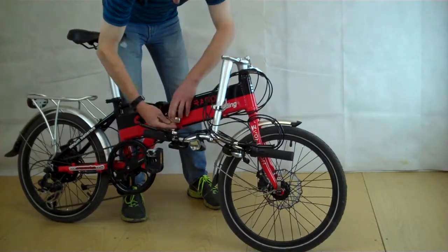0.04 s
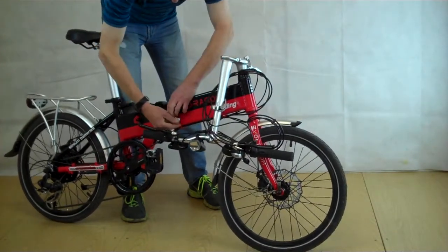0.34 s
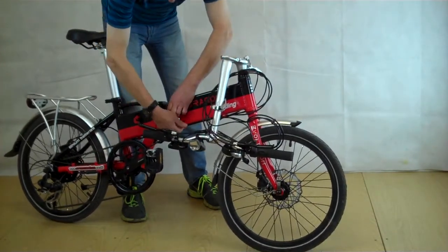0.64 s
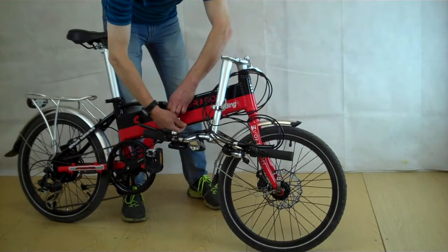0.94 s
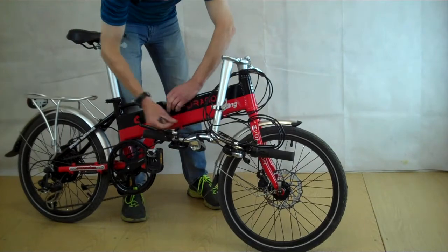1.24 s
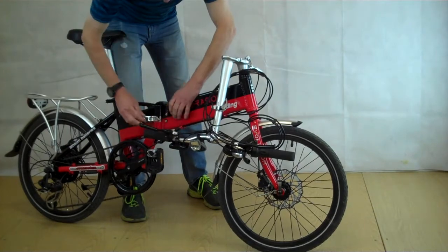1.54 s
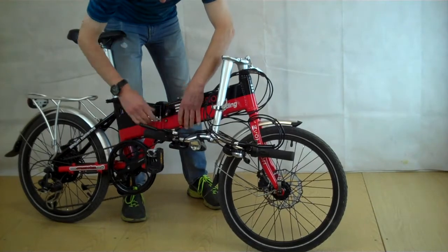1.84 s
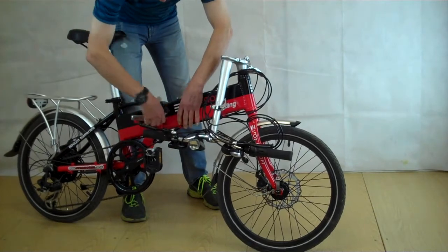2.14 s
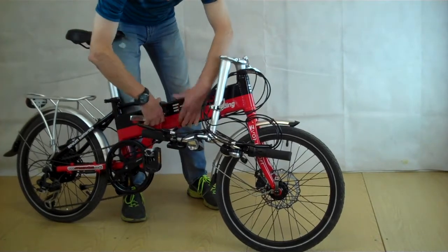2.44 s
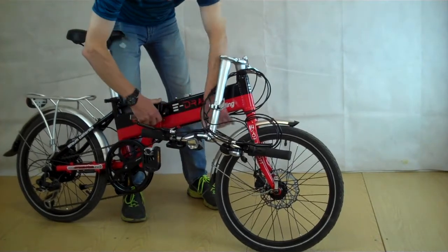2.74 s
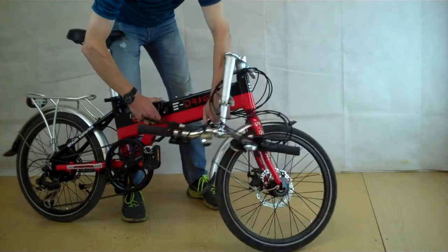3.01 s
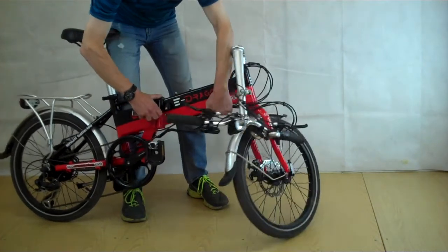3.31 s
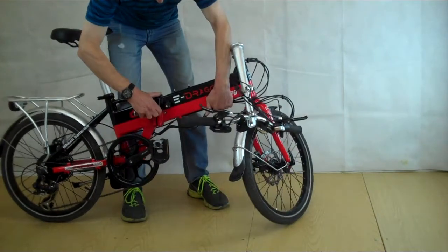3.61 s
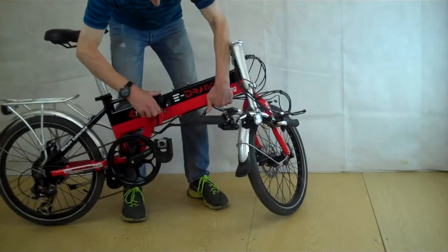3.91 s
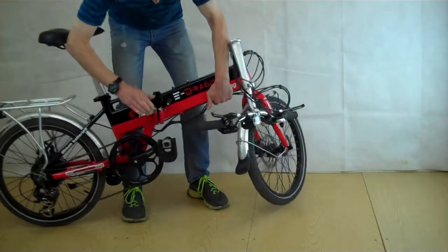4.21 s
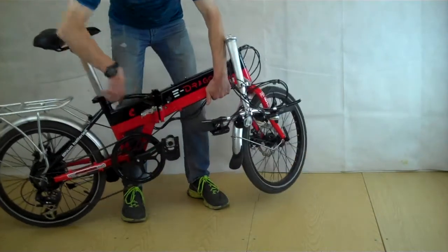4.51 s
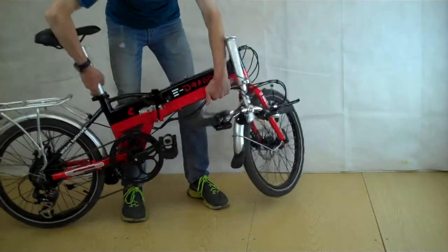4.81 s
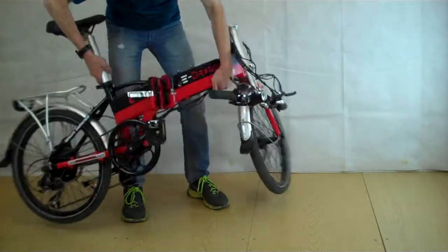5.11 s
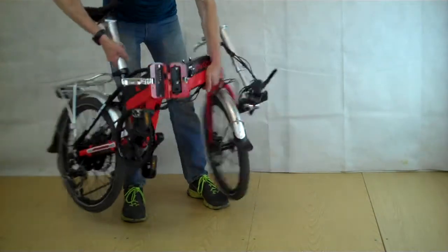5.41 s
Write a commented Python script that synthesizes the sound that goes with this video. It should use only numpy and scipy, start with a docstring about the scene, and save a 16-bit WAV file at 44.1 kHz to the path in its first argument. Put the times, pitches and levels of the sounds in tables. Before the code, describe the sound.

Sharp metal snaps and clacks of a bike being folded by hand, followed by rustling, rattles, tiny squeaks and a knock, indoors.

```python
"""A folding bicycle is folded by hand in a bare room. First the catch is touched and the frame latch
snaps open; lever and hinge clack, each impact setting the aluminium frame ringing. From about 3 s the
front tyre scrubs round on the floor, clothes swish, parts rattle and the hinge squeaks by stick-slip.
At 5 s the frame gives one dull knock. Throughout, the room reverberates over its faint steady noise,
and each of the two small microphone ports adds a treble resonance of its own."""
import sys
import numpy as np
from scipy import signal
from scipy.fft import rfft, irfft, next_fast_len
from scipy.io import wavfile

SR = 44100
rng = np.random.default_rng(int(sys.argv[2]) if len(sys.argv) > 2 else 0)


def generate_wav(sig):
    """Save sig (samples, or channels by samples) to the path in sys.argv[1] as 16-bit PCM at SR."""
    pcm = np.round(np.clip(np.atleast_2d(sig).T, -1, 1) * 32767).astype(np.int16)
    wavfile.write(sys.argv[1], SR, pcm)


N = 244755
TIME = np.arange(N) / SR


def from_db(db):
    """Amplitude ratio of a level in decibels."""
    return 10 ** (np.asarray(db) / 20)


def unit_rms(x):
    """Normalisation to unit mean power."""
    return x / np.sqrt(np.mean(x ** 2) + 1e-20)


def at_hz(points, hz):
    """Interpolation of a curve on a log-frequency axis."""
    frequency_hz, value = np.transpose(points)
    return np.interp(np.log(np.maximum(hz, 1)), np.log(frequency_hz), value)


def bell(hz, centre_hz, octaves):
    """Gaussian peak of height 1 on a log-frequency axis."""
    return np.exp(-.5 * (np.log2((hz + 1) / centre_hz) / octaves) ** 2)


def coloured(x, db_of_hz):
    """Minimum-phase filtering: folding the cepstrum makes the given dB response causal."""
    size = 2 * next_fast_len(x.shape[-1] // 2 + 2048)
    hz = np.arange(size // 2 + 1) * SR / size
    cepstrum = irfft(np.log(from_db(db_of_hz(hz))))
    cepstrum[1:size // 2] *= 2
    cepstrum[size // 2 + 1:] = 0
    return irfft(rfft(x, size) * np.exp(rfft(cepstrum)))[..., :x.shape[-1]]


def shaped(x, spectrum):
    """Spectral shaping, normalised to unit power."""
    return unit_rms(coloured(x, lambda hz: at_hz(spectrum, hz)))


def strokes(rows, roundness=1.71):
    """Incoherent addition: the envelope of movements that swell and fade, summed in power."""
    power = 0
    for peak_s, level_db, swell_s, fade_s in rows:
        from_peak = np.abs(TIME - peak_s) / np.where(TIME < peak_s, swell_s, fade_s)
        power = power + from_db(level_db) ** 2 * np.exp(-from_peak ** roundness)
    return np.sqrt(power)


# Likeness of left and right in a diffuse field: frequency_hz, coherence (0 to 1)
COHERENCE = [(30, 0), (120, .5), (300, .94), (800, .92), (1400, .82), (2600, .45), (4400, .05)]
def diffuse_noise():
    """Diffuse field: white noise, coherent between the sides in the low midrange, not in the treble."""
    mid, side = rfft(rng.standard_normal((2, N)))
    coherence = np.clip(at_hz(COHERENCE, np.arange(len(mid)) * SR / N), 0, 1)
    return irfft(np.sqrt((1 + coherence) / 2) * mid + np.sqrt((1 - coherence) / 2) * side * [[1], [-1]], N)


# Spectrum of the room's steady noise: frequency_hz, relative_db
AMBIENT_SPECTRUM = [(20, -3.5), (70, -4.5), (200, -7.5), (500, -5), (900, -0.5), (1300, -5.5), (1650, -0.5),
                    (2300, -5), (4000, -7), (8000, -16), (14000, 2.5)]
def ambient_noise(level_db=-50.5):
    """Noise floor: faint stationary sound arriving from all sides."""
    return from_db(level_db) * shaped(diffuse_noise(), AMBIENT_SPECTRUM)


# Shifts of weight on the floor: peak_s, level_db, swell_s, fade_s
WEIGHT_SHIFTS = [(3.55, -63, .15, .15), (4.26, -59, 0.043, 0.084), (5.1, -62.5, 0.21, 0.17)]
# Spectrum of the floor's rumble: frequency_hz, relative_db
FLOOR_SPECTRUM = [(30, -8), (70, -11), (180, 8), (400, -7), (1200, -8.5)]
def floor_rumble():
    """Forced vibration: the wooden floor rumbles under a shifting load."""
    return strokes(WEIGHT_SHIFTS) * shaped(diffuse_noise(), FLOOR_SPECTRUM)


# Reverberation time of the room: frequency_hz, t60_s
REVERB_TIMES = [(150, 0.7), (500, 0.49), (1500, 0.65), (4000, 0.66), (7000, 0.58), (14000, 0.34)]
# Strength of the reverberant tail: frequency_hz, gain_db
REVERB_GAINS = [(150, 3.7), (1000, 2.56), (3000, 0.9), (7000, -1.67), (14000, 1.6)]
def room_response(early_db=2.0, early_decay_s=0.0084, early_rise_s=0.0048, tail_rise_s=0.011):
    """Reverberation: early reflections, then a tail that decays exponentially in each octave band."""
    t = TIME[:SR]
    noise_spectrum = rfft(diffuse_noise()[:, :SR])
    bins_hz = np.arange(noise_spectrum.shape[1])
    centres_hz = np.geomspace(125, 16000, 8)
    tail = 0
    for centre_hz, weights in zip(centres_hz, np.eye(len(centres_hz))):
        band = irfft(noise_spectrum * at_hz(np.c_[centres_hz, weights], bins_hz), SR)
        decay_s = at_hz(REVERB_TIMES, centre_hz) / np.log(1000)
        envelope = np.exp(-t / decay_s) * np.sqrt(2 / (decay_s * SR))  # unit energy
        tail = tail + band * from_db(at_hz(REVERB_GAINS, centre_hz)) * envelope
    early = diffuse_noise()[:, :SR] * np.exp(-t / early_decay_s) * np.sqrt(2 / (early_decay_s * SR))
    early *= from_db(early_db) * (1 - np.exp(-t / early_rise_s))
    return early + tail * (1 - np.exp(-t / tail_rise_s))


def friction(spectrum, grain_db, flutter_db, catch_db=-6.5, catches_per_s=130):
    """Sliding friction: countless tiny slips come in clumps; now and then a fibre catches and ticks."""
    slips = rng.standard_normal(N) * from_db(grain_db * drift(900) + flutter_db * drift(45))
    catches = (rng.random(N) < catches_per_s / SR) * rng.standard_normal(N)
    return shaped(unit_rms(slips) + from_db(catch_db) * unit_rms(catches), spectrum)


def drift(rate_hz):
    """Random modulation: a wandering curve of unit rms through unevenly spaced values."""
    knots_s = np.cumsum(rng.uniform(.5, 1.5, 8000)) / rate_hz
    return unit_rms(np.interp(TIME, knots_s, rng.standard_normal(len(knots_s))))


# Pushes of the tyre over the floor: peak_s, level_db, swell_s, fade_s
TYRE_PUSHES = [(3.02, -48, 0.099, 0.072), (3.65, -56.5, 0.28, 0.083), (4.18, -54.5, 0.084, 0.11),
               (4.78, -49.5, 0.13, 0.033), (4.9, -49, 0.014, 0.02), (5.54, -52, 0.087, .1)]
# Spectrum of the scrubbing tyre: frequency_hz, relative_db
TYRE_SPECTRUM = [(60, -22), (250, -18.5), (470, -5), (700, -5), (1000, 0.5), (1800, 2), (3000, 0.5),
                 (4000, 1.5), (5000, 4), (6500, 2), (14000, -15)]
def tyre_scrub():
    """Friction of rubber on the floor: fluttering broadband noise with each push."""
    return strokes(TYRE_PUSHES) * friction(TYRE_SPECTRUM, grain_db=1.0, flutter_db=4.5)


# Swing of the front wheel: peak_s, level_db, swell_s, fade_s
WHEEL_SWING = [(3.04, -42, 0.025, 0.028)]
# Spectrum of its scrape: frequency_hz, relative_db
WHEEL_SPECTRUM = [(500, -54), (3000, -3.5), (4100, -20), (4900, 4), (5800, -4), (7500, -4.5), (14000, -26)]
def wheel_scrape():
    """Friction in one brief slide: a brighter scrape as the front wheel is swung round."""
    return strokes(WHEEL_SWING) * friction(WHEEL_SPECTRUM, grain_db=-3.0, flutter_db=4.5)


# Hands and sleeves sliding over latch and frame: peak_s, level_db, swell_s, fade_s
SLEEVE_SLIDES = [(0.01, -64.5, .05, 0.069), (0.44, -75, .01, 0.018), (0.9, -71, 0.096, .1),
                 (2.19, -61.5, 0.011, .04), (2.68, -59, .05, 0.022), (3.04, -46.5, .07, 0.068),
                 (3.345, -49.5, 0.013, 0.022), (3.55, -58.5, 0.13, 0.046), (3.76, -42.5, 0.069, 0.043),
                 (3.91, -37.5, 0.062, 0.054), (3.99, -40, 0.014, .04), (4.1, -39.5, 0.045, 0.015),
                 (4.21, -42, 0.054, 0.069), (4.37, -42.5, .005, 0.033), (4.45, -41.5, 0.038, 0.017),
                 (4.62, -49, 0.02, 0.04), (4.72, -40, 0.0084, 0.017), (4.79, -40, 0.041, 0.022),
                 (4.9, -33.5, 0.019, 0.019), (5.03, -43, 0.02, 0.015), (5.23, -49.5, 0.2, .3)]
# Spectrum of sliding cloth: frequency_hz, relative_db
CLOTH_SPECTRUM = [(300, -24), (1500, -17.5), (3000, -6), (4500, -0.5), (6000, 2.5), (7500, 5.5), (9000, -2),
                  (11000, -4.5), (14000, -0.5)]
def clothes_swish():
    """Friction of cloth: a smooth hiss, loudest where the movement is fastest."""
    return strokes(SLEEVE_SLIDES) * friction(CLOTH_SPECTRUM, grain_db=1.5, flutter_db=-1.0)


# Squeaks of latch and hinge: peak_s, half_length_s, pitch_hz, level_db, overtones_db
STICK_SLIPS = [(2.192, 0.031, 4560, -58, -19), (3.766, 0.013, 3357, -43, 4),
               (3.978, 0.0097, 3270, -55.5, 20.5), (3.993, 0.012, 6210, -35, -18),
               (4.884, 0.009, 3020, -51, 6), (5.184, 0.033, 7360, -48.5, -23),
               (5.186, 0.066, 8820, -50.5, -18), (5.255, 0.017, 7060, -45, -22),
               (5.363, 0.054, 6900, -50, -15)]
def squeaks(waver=0.031, third_harmonic_db=-1.5):
    """Stick-slip oscillation: a rough, wavering tone of three harmonics that swells and dies."""
    out = np.zeros(N)
    for peak_s, half_length_s, pitch_hz, level_db, overtones_db in STICK_SLIPS:
        phase = 2 * np.pi * np.cumsum(pitch_hz * (1 + waver * drift(1100))) / SR
        overtones = np.sin(2 * phase) + from_db(third_harmonic_db) * np.sin(3 * phase)
        tone = np.sin(phase) + from_db(overtones_db) * overtones
        out += tone * from_db(level_db) * np.exp(-.5 * ((TIME - peak_s) / half_length_s) ** 2)
    return out


# Modes of the aluminium frame: pitch_hz, relative_db, t60_s
FRAME_MODES = [(207, -4, .33), (322, 11.5, 0.72), (372, -3, 0.35), (790, 12, 0.082), (900, -8.5, 0.21),
               (1010, -12, 0.44), (1183, 4.5, 0.71), (1365, 5, 1), (1656, 9, 0.106), (2100, -5, 0.35),
               (2700, 3, 0.27), (3120, -11, 0.32), (3600, -10, 0.26), (3900, -12, .22), (4360, -17, .4),
               (5250, -3, 0.38), (5700, -4, 0.48), (5740, -2, .4), (6000, 6, .4), (7220, -11, 0.29),
               (7820, 17, 0.2)]
def frame_modes(port_delay_s=.00005):
    """Normal modes: damped sinusoids, each from its own direction, so reaching one port first."""
    t = TIME[:SR]
    pitch_hz, relative_db, t60_s = np.transpose(FRAME_MODES)[:, :, None]
    lag_s = port_delay_s * rng.uniform(-0.37, 1, pitch_hz.shape)
    decay = from_db(relative_db - 60 * t / t60_s) / np.sqrt(t60_s * SR)
    return decay * np.cos(2 * np.pi * pitch_hz * np.array([t + lag_s / 2, t - lag_s / 2]))


# Spectrum of a metal contact: frequency_hz, gain_db
IMPACT_SPECTRUM = [(40, -27), (130, -36), (200, -34), (330, -25.5), (650, -12), (850, -4.5), (1300, -0.5),
                   (1700, -3), (2600, -0.5), (3300, 0.5), (5000, -0.5), (8000, -6), (10500, -10.5),
                   (14000, -12)]
def impact(chatter_s, thud_db, bright_db, part_hz, part_db, rise=0.23, uneven_db=2.0):
    """Contact chatter, filtered by the struck part, with its own amount of low thud and bright click."""
    t = TIME[:SR // 8]
    force = rng.standard_normal(len(t)) * np.exp(-t / chatter_s)
    touching = (1 - np.exp(-t / (rise * chatter_s))) * np.exp(-(t / (4 * chatter_s)) ** 2)
    for _ in range(4):
        # hard metal feeds all pitches evenly: flatten the spectrum, keep the burst short
        force = irfft(np.exp(1j * np.angle(rfft(force))), len(t)) * touching
    # every striking spot favours some pitches over others
    spot = np.c_[np.arange(600, 15000, 350), uneven_db * rng.standard_normal(42)]
    return coloured(force / np.linalg.norm(force), lambda hz: at_hz(IMPACT_SPECTRUM, hz) + at_hz(spot, hz)
                    + thud_db * bell(hz, 337, octaves=0.95)
                    + bright_db * bell(hz, 7900, octaves=0.94)
                    + part_db * sum(bell(hz, pitch_hz, octaves=0.12) for pitch_hz in part_hz))


# Catch and latch (0.6-0.9 s), lever (1.3-1.6 s), hinge (2.3 s), rattles (2.7-4.8 s), frame knock (5 s):
# start_s, relative_db, chatter_s, thud_db, bright_db, pitch_1_hz, pitch_2_hz, part_db, pan_db
METAL_CONTACTS = [ (0.5934, -17.5, 0.0029, 30, 5, 4670, 7600, 9.3, -2),
                  (0.9395, 19.5, 0.0031, -0.5, 2.5, 1610, 2540, 6, 0.5),
                  (1.254, -2, 0.0064, 6, -4.5, 1320, 2130, 4.2, 3),
                  (1.322, -7.5, 0.0046, 6, 8, 2550, 7750, 9.3, 5),
                  (1.3268, 5, 0.0018, -1, 2, 2510, 5930, 3.1, -1),
                  (1.3295, 9.5, 0.0024, -7, -2, 2570, 7370, 11, 0.5),
                  (1.4296, 14.5, 0.0039, -1.5, -5, 4000, 6000, 6, 1),
                  (1.625, 10.5, 0.0085, 3, -1.5, 847, 320, 10.4, -2),
                  (1.6288, 13, 0.0047, -7, 7, 1630, 8100, 4.3, 4),
                  (2.2852, -1, 0.0024, -11, -1, 2370, 4370, 6.7, 1),
                  (2.3063, 2, .0035, -8, 5, 6400, 1280, 9.2, 1),
                  (2.3139, 6, 0.0025, -1, 7, 3920, 7450, 10.3, 3.5),
                  (2.745, -18, 0.0031, 16, 1.5, 3550, 1320, 6.9, 1),
                  (2.888, -20, 0.0053, 15, -7, 1500, 800, 1, -8),
                  (2.93, -19, 0.0074, 25.5, 6.5, 1410, 477, 9.8, 8),
                  (3.901, -14.5, 0.0023, 0, 8, 2680, 1210, 5.9, 4),
                  (3.98, -18, 0.0047, -4, 19.5, 6740, 10100, 11.3, 3),
                  (4.06, -16.5, 0.0023, -2, 13, 2260, 9600, 13, 3),
                  (4.162, -6, 0.0066, 11, -4, 885, 1530, 1.4, 1),
                  (4.243, 0, 0.0065, -2, -0.5, 3420, 180, 7.3, 2),
                  (4.368, -17, 0.0047, 12, 2, 2230, 7560, 1, 12),
                  (4.45, -17, 0.01, 20, 15.5, 2760, 7500, 1.1, 7),
                  (4.7164, -13.5, 0.0048, 30, 13, 960, 7450, 11, 4),
                  (4.786, -6.5, 0.0073, -7, 7, 1120, 2200, 2.2, 0),
                  (5.0333, 6.5, 0.0043, 20.5, -6, 993, 365, 10, -1.5),
                  (5.04, 0, 0.0041, 19.5, -16, 220, 455, 18, 5)]
def knocks(blow_db=-4.0, ring_db=-19.0):
    """Impact excitation: the blows of latch, lever and hinge, and the frame's modal response to each."""
    blows, rings = np.zeros((2, 2, N + SR))
    modes = frame_modes()
    for start_s, relative_db, chatter_s, thud_db, bright_db, *part_hz, part_db, pan_db in METAL_CONTACTS:
        blow = from_db(relative_db + blow_db) * impact(chatter_s, thud_db, bright_db, part_hz, part_db)
        ringing = from_db(ring_db + 2 * rng.standard_normal(len(FRAME_MODES))) @ modes
        start = round(start_s * SR)
        blows[:, start:start + len(blow)] += blow * from_db([[pan_db / 2], [-pan_db / 2]])
        rings[:, start:start + SR] += signal.fftconvolve(blow[None], ringing, axes=1)[:, :SR]
    return blows[:, :N], rings[:, :N]


def scene(rubbing_left_db=3.0, rubbing_right_db=-1.0):
    """Superposition: direct sound, reverberation of blows and rubbing, floor rumble and room noise."""
    rubbing = clothes_swish() + tyre_scrub() + wheel_scrape() + squeaks()
    blows, rings = knocks()
    into_room = blows.mean(axis=0) + rubbing
    reverberation = signal.fftconvolve(into_room[None], room_response(), axes=1)[:, :N]
    direct = blows + rings + rubbing * from_db([[rubbing_left_db], [rubbing_right_db]])
    return direct + reverberation + floor_rumble() + ambient_noise()


# Responses of the microphone ports, left then right: frequency_hz, gain_db
PORT_RESPONSES = [
    [(2000, 2), (4500, -1.5), (6200, 6), (7250, 13), (7800, 8), (8700, 4), (10500, -2), (14000, -14.5)],
    [(2000, 4), (4200, 2), (5100, 6.5), (5900, 13), (6900, 2), (8300, -4.5), (10500, -10), (14000, -15)],
]
def record(dry, clip_level=.92, cutoff_hz=14200):
    """Port resonance colours each side; the loudest snap overloads, then a low-pass cuts the top."""
    resonant = np.array([coloured(side, lambda hz: at_hz(port, hz))
                         for side, port in zip(dry, PORT_RESPONSES)])
    low_pass = signal.ellip(10, .2, 70, cutoff_hz, fs=SR, output="sos")
    return signal.sosfilt(low_pass, np.clip(resonant, -clip_level, clip_level))


dry = scene()
out = record(dry)
generate_wav(out)
```